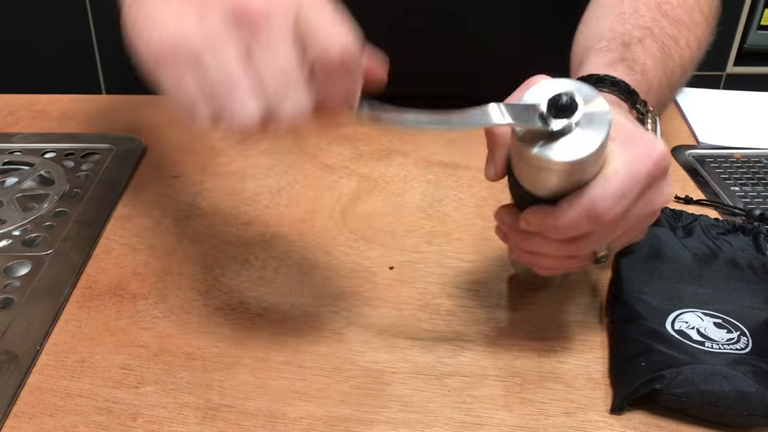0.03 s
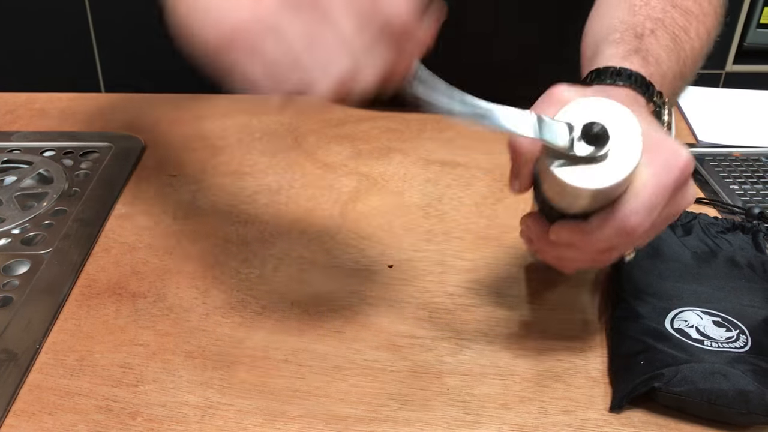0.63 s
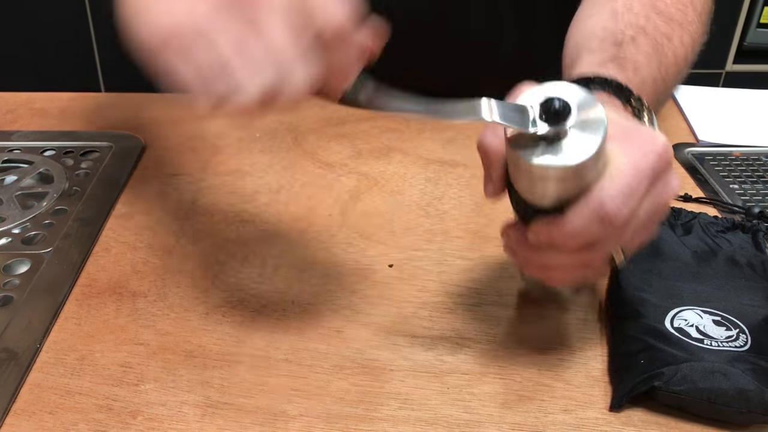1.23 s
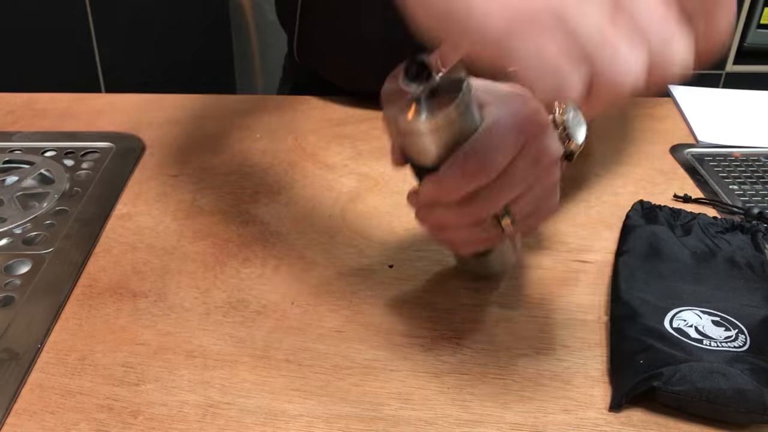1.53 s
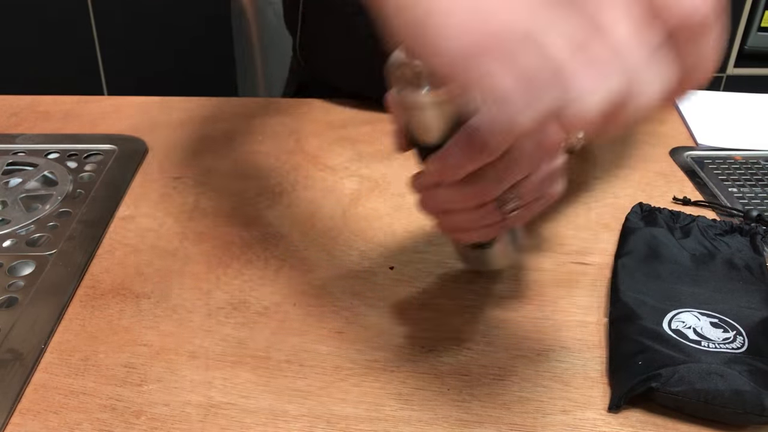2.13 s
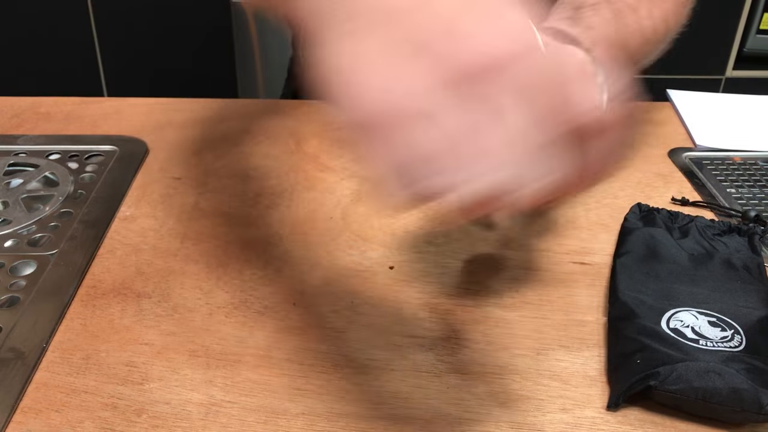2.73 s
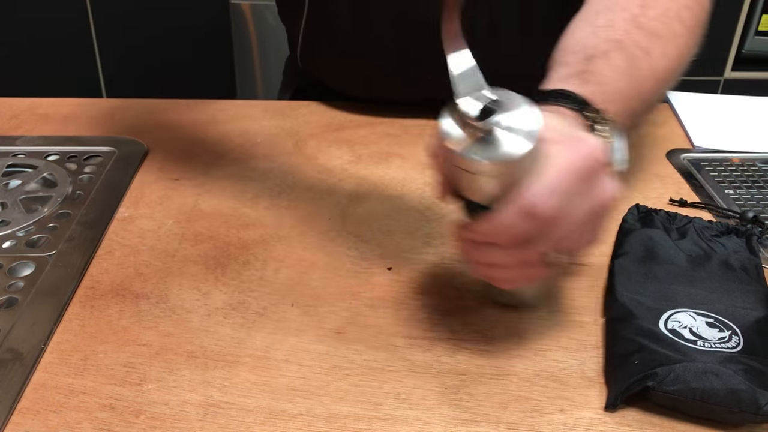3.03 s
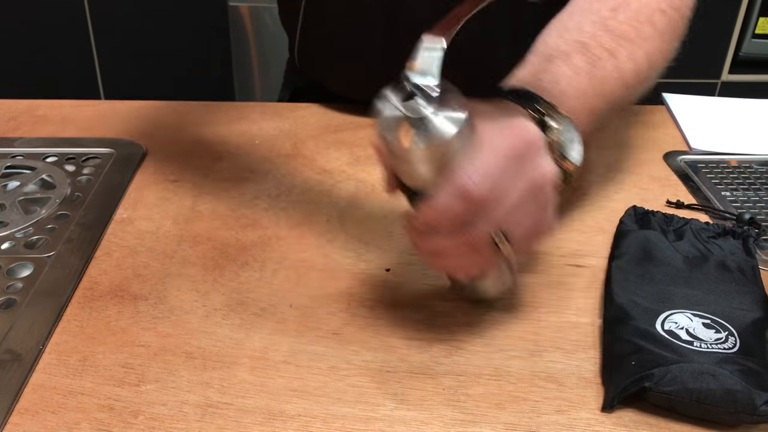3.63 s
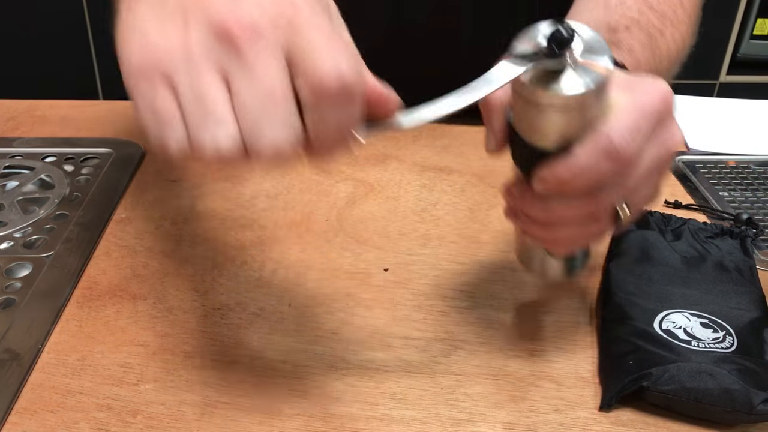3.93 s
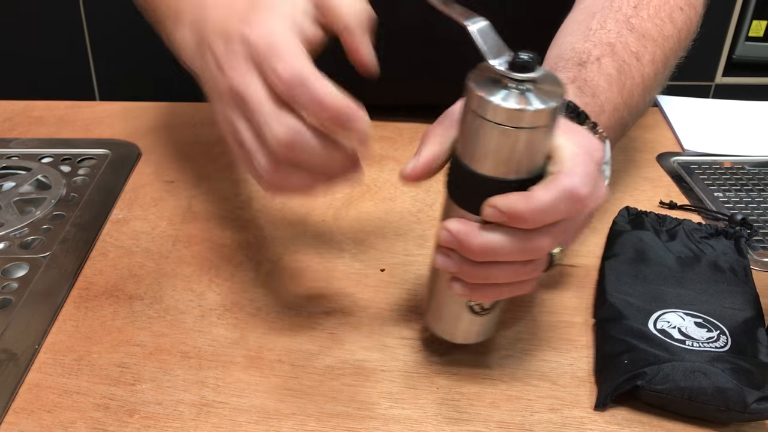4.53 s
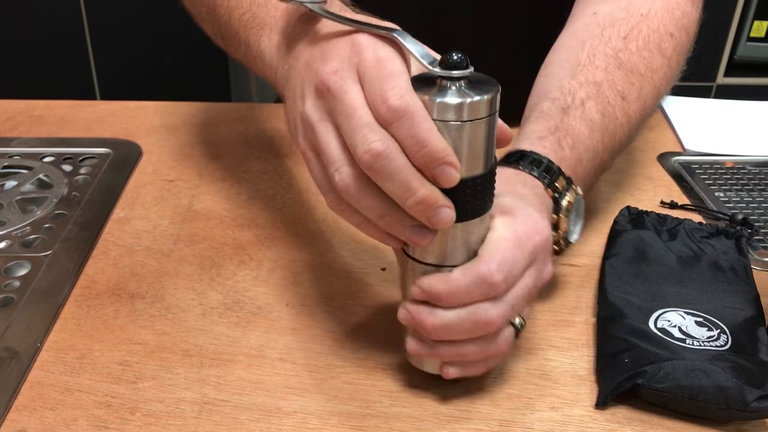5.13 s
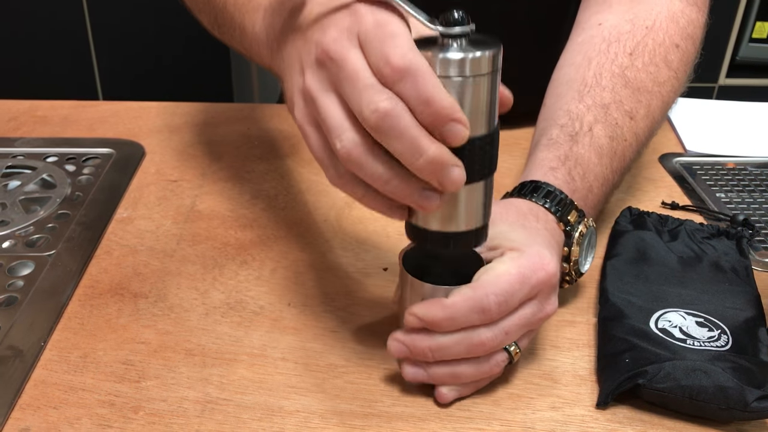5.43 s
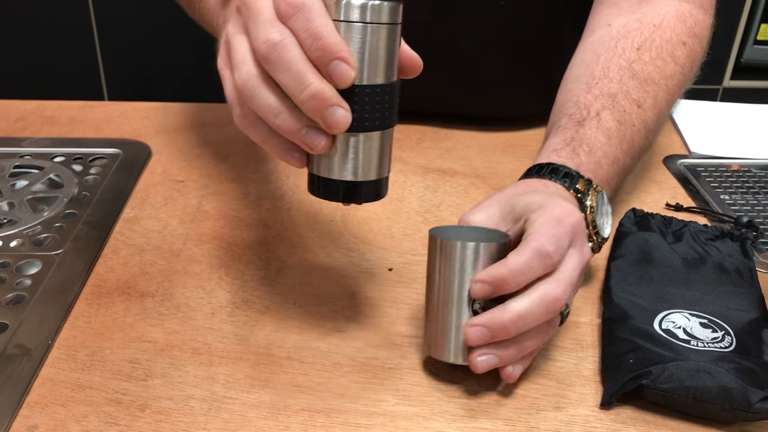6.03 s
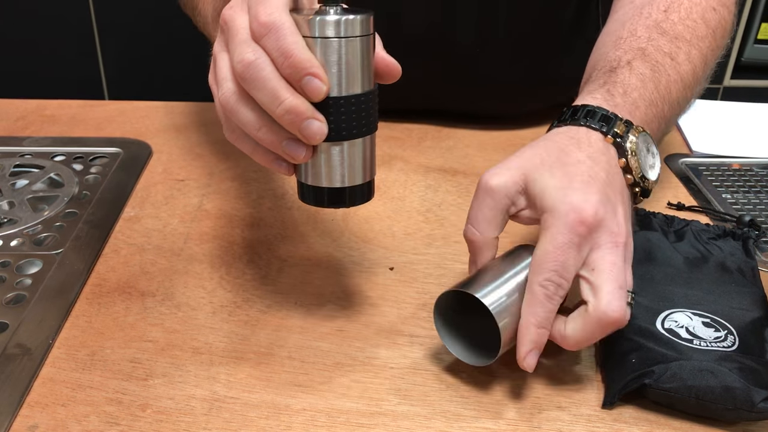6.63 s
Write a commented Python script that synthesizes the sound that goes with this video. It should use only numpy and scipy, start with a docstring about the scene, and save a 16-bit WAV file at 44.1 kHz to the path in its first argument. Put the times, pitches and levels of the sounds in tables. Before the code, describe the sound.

From the start, a steel hand grinder is cranked at a little under two turns a second. Coffee beans crunch and snap irregularly, while the mechanism scrapes and gives a tiny high squeak on most turns. The base bumps the wooden counter with a dull thump at about 2.1 seconds and a much louder, sharper knock at 3.7 seconds. The grinding stops near 4.3 seconds, and the crank settles with a quick cluster of metallic clicks. Faint ticks and the soft slide of hands on steel follow. At about 5.4 seconds the tight catch cup comes off with a loud, hollow pop. It is set down with a soft knock near 6 seconds, and two faint ticks follow around 6.4 seconds. Everything is an arm's length from the microphone, in an echoing kitchen with a low, steady ventilation hum.

```python
"""A steel hand grinder on a wooden kitchen counter, an arm's length from the microphone.
For four seconds it is cranked: beans crumble and snap between the burrs, the shaft rubs and squeaks
about once a turn, and the base thumps down twice. The crank is let go with a few clicks. Then the tight
catch cup comes off with a loud pop and is set down. The kitchen echoes throughout, over a low hum."""
import sys
import numpy as np
from scipy import signal
from scipy.fft import rfft, irfft
from scipy.io import wavfile
from scipy.ndimage import uniform_filter1d

SR = 44100
rng = np.random.default_rng(int(sys.argv[2]) if len(sys.argv) > 2 else 0)


def transcribe(u):
    """Save the signal u as a 16-bit wav file named by the first command-line argument.

    u: samples, shape (n,) or (channels, n), limited to [-1, 1]; the rate is SR.
    q: integer samples, one column per channel.
    """
    v = np.clip(np.atleast_2d(u).T, -1, 1)
    q = np.round(v * 32767).astype(np.int16)
    wavfile.write(sys.argv[1], SR, q)


N = 303408
T = np.arange(N) / SR
TOP_HZ = 17900
TUBE_HZ, TUBE_WIDTH_HZ = 3126, 440  # the ring of the grinder's wall
# beans that snap: (time [s], onset level [dB], treble [dB], t60 [s], favoured pitch [Hz], its gain [dB])
SNAPS = [(0.1496, -23, 1, 0.039, 3000, 10), (0.222, -30, 6, 0.036, 3300, 12),
         (0.2455, -26.5, 6, 0.021, 2300, 7), (0.314, -28, 1, 0.01, 3000, 6),
         (0.328, -30, -8, 0.011, 700, -8), (0.3653, -27.5, -10, 0.015, 700, -3),
         (0.378, -26.0, 4, 0.034, 1300, 6), (0.5153, -30, -1, 0.023, 3000, 3),
         (0.554, -29, 20, 0.045, 1100, -10), (0.578, -29, 9, 0.042, 2300, 0),
         (0.635, -32, 4, 0.013, 2000, -6), (0.7138, -36.5, 12, 0.0072, 2650, 6),
         (0.778, -36.5, 22, 0.0093, 700, 0), (0.85, -31.0, 10, 0.012, 1300, 11),
         (0.947, -27.5, 3, 0.017, 2300, 10), (1.1245, -31, 10, 0.034, 2300, -6),
         (1.166, -33.5, 11, 0.031, 1100, 10), (1.2087, -27, 5, 0.018, 1100, 4),
         (1.2291, -20.5, 6.5, 0.054, 1300, 7), (1.389, -29, -6, 0.025, 3000, -12),
         (1.422, -31, -2, 0.019, 3300, -9), (1.443, -28.5, 3, 0.02, 3000, -2),
         (1.567, -26.5, -5, 0.02, 1300, 11), (1.5906, -27.0, -7, 0.008, 3800, 9),
         (1.6786, -23.5, 4, 0.018, 3000, 6), (1.748, -29, -14.5, 0.012, 4500, -3),
         (1.915, -21.5, 5.5, 0.025, 2000, 2), (1.965, -29, 6, 0.013, 3000, 6),
         (2.163, -32, 3, 0.01, 1300, 11), (2.218, -27.5, 9.5, 0.011, 1500, 17),
         (2.277, -36.5, 22, 0.012, 850, 3), (2.291, -27.5, 9.5, 0.025, 1300, 12),
         (2.4623, -29.0, 10, 0.017, 700, 13), (2.512, -30, 7.5, 0.01, 2650, 4),
         (2.5717, -28.5, 17, 0.018, 2000, 9), (2.6846, -29, 0, 0.014, 3000, -2),
         (2.7542, -36.5, 22, 0.01, 1100, -3), (2.773, -29, -6, 0.012, 1750, 2),
         (2.8226, -27.5, 0, 0.02, 1100, 4), (2.912, -31.5, -2, 0.017, 4500, -3),
         (3.055, -23, 1, 0.014, 3000, -5), (3.073, -35, 14, 0.013, 700, -6),
         (3.157, -28.0, -1, 0.016, 3300, 3), (3.256, -28.0, -3, 0.01, 2650, -11),
         (3.3747, -29, -2, 0.027, 3800, 5), (3.526, -33, 30, 0.018, 1100, 9),
         (3.552, -31.5, 6, 0.012, 3300, 0), (3.569, -33, 2, 0.012, 1750, -8),
         (3.5907, -25.5, 8, 0.029, 3000, -3), (3.6986, -28.0, -11, 0.019, 3800, -8),
         (3.8745, -30, -2, 0.009, 1500, 18), (3.945, -31.0, 5, 0.011, 1750, -4),
         (4.046, -34.0, 11, 0.01, 1300, 3), (4.061, -36, 7, 0.014, 3800, -3),
         (4.118, -31.5, 20, 0.012, 700, 8), (4.161, -27.5, -1, 0.016, 3300, 8),
         (4.2555, -44, 15, 0.0061, 2000, -5)]
# turns of the crank: (time [s], crumb level [dB], grit level [dB])
TURNS = [(-.2, -31, -35.5), (.34, -35, -49), (.91, -36, -45), (1.53, -35.5, -48.5), (2.1, -34, -43.5),
         (2.68, -35.5, -47), (3.22, -35, -51), (3.76, -38.5, -47), (4.28, -33.5, -54)]


def grinding(stop_s=4.27, stop_fade_s=0.02):
    """The burrs crush and rub until the crank stops, while whole beans snap."""
    cranking = np.clip((stop_s - T) / stop_fade_s, 0, 1)
    return (crushing() + rubbing()) * cranking + snapping()


def crushing(hold_s=0.013, hold_drop_db=2.5, powder_db=-54):
    """Crumbs, grit and powder follow the load on the burrs; the tube rings and mashed beans crunch."""
    # hard beans change the load: (time [s], half length [s], level change [dB])
    drags = [(0.405, 0.035, 2), (0.535, 0.076, 1.5), (0.637, 0.037, 5), (0.983, 0.049, 2.5),
             (1.663, 0.072, 1), (2.205, 0.039, -1), (2.403, .05, -0.5), (2.7, 0.018, 2), (2.91, 0.051, 3.5),
             (3.265, .08, 1.5), (3.58, 0.17, 7), (3.734, 0.037, -2), (4.223, 0.036, -2)]
    # the burrs run empty for a moment: (time [s], half length [s], drop [dB])
    gaps = [(0.123, 0.061, 7.5), (0.458, 0.015, 1.5), (0.662, 0.023, 8), (1.109, 0.0099, 14),
            (1.206, 0.016, 18), (1.491, 0.012, 12), (2.01, 0.012, 15.5), (3.008, 0.03, 1.5),
            (3.468, 0.043, 6.5)]
    # hiss of fine grounds: (frequency [Hz], gain [dB])
    powder_colour = [(3000, -39), (8000, -19), (10500, -12), (12100, 5.5), (13500, -1.5), (15000, 4),
                     (16100, 9.5), (17500, -7.5)]
    # ring of the tube wall: (time [s], level [dB])
    tube_level = [(0, -47), (.22, -40), (.45, -39), (.68, -42), (.95, -38), (1.17, -48), (1.42, -37),
                  (1.8, -43.5), (1.96, -36), (2.2, -37.5), (2.4, -48.5), (2.55, -35), (3, -45),
                  (3.11, -36.5), (3.46, -46.5), (3.6, -36.5), (4.06, -49), (4.22, -40)]
    # hollow crunches of mashed beans: (time [s], half length [s], level [dB])
    mashes = [(0.38, 0.016, -43), (0.523, 0.037, -38.5), (0.782, 0.024, -39.5), (1.064, 0.011, -37),
              (2.454, 0.021, -36.5), (2.885, 0.021, -35.5), (3.067, 0.01, -34.5), (4.125, .028, -39)]
    load_db = sum(db * swell(s, half) for s, half, db in drags)
    load_db -= sum(db * swell(s, half) for s, half, db in gaps)
    # a bean resists just before it snaps, and the crumbling slackens
    load_db -= hold_drop_db * sum(swell(s - hold_s / 2, hold_s) for s, *_ in SNAPS)
    crumb_db, grit_db = curves(TURNS)
    crumb_db += 0.97 * once_a_turn(at_turn=0.15) + load_db  # the arm pushes hardest early in the turn
    grit_db += 5.5 * once_a_turn(at_turn=0.6) + 0.52 * load_db  # grit hisses most on the far side
    crumbs = treble(body(crumble(rate=1500, spread_db=2.5, t60=0.025)), -19)
    grit = treble(body(crumble(rate=1900, spread_db=4.5, t60=0.011)), 15.7, corner_hz=8900)
    powder = colour(crumble(rate=2000, spread_db=5.5, t60=.01), powder_colour)
    fragments = unit(crumbs) * undb(crumb_db) + unit(grit) * undb(grit_db)
    hiss = unit(powder) * undb(powder_db + .3 * load_db)
    ringing = friction(TUBE_HZ, TUBE_WIDTH_HZ, drift_hz=30) * undb(curves(tube_level)[0])
    mashing = friction(hz=733, width_hz=253, drift_hz=50) * swells(mashes)
    return shifting(fragments, spread_db=2, rate=70) + ringing + mashing + hiss


def snapping():
    """Each whole bean fractures, rings the tube and favours a pitch of its own."""
    out = np.zeros(N)
    for s, db, treble_db, t60, hz, ring_db in SNAPS:
        fracture = body(burst(t60, tail_db=-21, tail_t60=.04, edge=4))
        fracture += resonate(fracture, TUBE_HZ, TUBE_WIDTH_HZ)
        fracture += undb(ring_db) * resonate(fracture, hz, width_hz=300)
        fracture = treble(fracture, treble_db)
        onset_rms = fracture[:int(.008 * SR)].std()
        add(out, s, fracture * undb(db) / onset_rms)
    return out


def body(x):
    """Whatever breaks between the burrs sounds through the steel tube."""
    # broad colour of the filled grinder in the hand: (frequency [Hz], gain [dB])
    outline = [(100, -28.5), (300, -11), (480, -8), (650, -1.5), (1000, -7), (1600, 2.5), (2500, 0.5),
               (3300, -3.5), (3700, -6), (4500, -7), (5200, -10.5), (8000, -14), (13500, -26), (16500, -26)]
    # its resonances: (frequency [Hz], width [Hz], gain [dB])
    resonances = [(777, 237, 1.5), (1254, 180, -1.5), (6020, 71, -6.5), (8760, 470, -24), (11980, 330, -17)]
    x = colour(x, outline)
    return x + sum(undb(db) * resonate(x, hz, width) for hz, width, db in resonances)


def rubbing(low_ratio=0.497, low_db=-1.5):
    """The burr sings against its ring once a turn, on two resonances; wedged beans scrape the steel."""
    # burr on ring: (time [s], half length [s], pitch [Hz], level [dB])
    rubs = [(.26, 0.076, 7300, -42.5), (.38, 0.057, 7280, -42.5), (.44, .022, 6740, -46),
            (.885, 0.08, 7270, -45), (1.56, 0.16, 7120, -47.5), (2.115, 0.18, 7160, -48.5),
            (2.7, 0.078, 7130, -46), (3.22, 0.11, 7140, -49.5), (3.77, 0.11, 7000, -53)]
    # wedged beans: (time [s], half length [s], pitch [Hz], level [dB])
    scrapes = [(.26, .03, 4330, -52), (.645, 0.032, 4860, -41.5), (.83, .04, 4300, -53),
               (1.34, 0.1, 4800, -47.5), (1.745, 0.064, 4400, -40), (1.84, 0.025, 4200, -45),
               (2.03, .03, 4230, -43), (2.58, 0.1, 4600, -44.5), (2.93, .055, 4400, -40),
               (3.08, 0.027, 4600, -43), (3.24, .06, 4070, -47), (3.6, 0.08, 4600, -45),
               (3.71, 0.036, 4050, -47), (3.87, 0.2, 4200, -46), (4.2, 0.076, 4400, -47.5)]
    rub_hz, rub_gain = strokes(rubs)
    scrape_hz, scrape_gain = strokes(scrapes)
    singing = friction(rub_hz, width_hz=530)
    singing += undb(low_db) * friction(low_ratio * rub_hz, width_hz=670)
    return rub_gain * singing + scrape_gain * friction(scrape_hz, width_hz=670)


def squeaks(waver=0.033, crest=0.77, edge_db=-17):
    """The shaft catches: a whistle that sinks in pitch, swells to a sharp crest and lets go."""
    # catches of the shaft: (time [s], length [s], start pitch [Hz], end pitch [Hz], level [dB])
    catches = [(0.376, 0.007, 8500, 7800, -35), (0.99, 0.024, 9260, 8140, -31.5),
               (0.997, .008, 15400, 14900, -34), (1.597, 0.0057, 7560, 7060, -28.5),
               (1.607, .013, 10100, 9100, -37.5), (2.22, 0.021, 10800, 10500, -43),
               (2.27, .016, 9300, 8900, -38), (2.746, 0.016, 11850, 10550, -24.5),
               (3.348, 0.011, 10550, 10480, -23), (3.937, 0.032, 9700, 9400, -42.5)]
    out, unsteady, grip = np.zeros(N), walk(1400), undb(2 * walk(700))
    for s, length, start_hz, end_hz, db in catches:
        u = np.linspace(0, 1, int(length * SR))
        span = slice(int(s * SR), int(s * SR) + len(u))
        hz = np.interp(u, [0, 1], [start_hz, end_hz]) * (1 + waver * unsteady[span])
        envelope = undb(np.interp(u, [0, crest, 1], [edge_db, 0, edge_db])) * np.sqrt(u * (1 - u)) * 2
        add(out, s, undb(db) * grip[span] * envelope * np.sin(phase(hz)))
    return out


def thumps():
    """The grinder or its cup pushes on the counter; a longer contact gives a duller knock."""
    # blows on the counter: (time [s], peak [dB], contact time [s])
    blows = [(2.0747, -16.5, 0.0038), (3.658, -2.5, 0.0011), (3.668, -25, 0.0059), (5.955, -35, 0.0022),
             (5.967, -31, 0.0022)]
    # counter modes: (frequency [Hz], level [dB], t60 [s])
    counter = [(76, -31, 0.16), (109, -30, 0.15), (153.5, -21, 0.19), (221, 1, 0.092), (305, 2, 0.033),
               (403, 6, 0.026), (618, 7, 0.021), (730, -20, 0.023)]
    out = np.zeros(N)
    for s, db, contact_s in blows:
        force = np.hanning(int(contact_s * SR) + 3)
        add(out, s, peak(np.convolve(ring(counter), force), db))
    return out


def pop(rise_s=0.00098):
    """Air rushes into the freed cup and rings it; the rim knocks just after."""
    # the cup lets go, then chatters: (time [s], ring peak [dB], crack peak [dB], ring tilt [dB/octave])
    pops = [(5.4278, 1, -5, 1), (5.4431, -13.5, -6, 7.5), (5.448, -20.5, -19, -2.5)]
    # cup modes: (frequency [Hz], level [dB], t60 [s])
    cup_modes = [(212, -21.5, 0.1), (359, -10.5, 0.032), (530, 0, .019), (613, 1.5, 0.023),
                 (991, -5.5, 0.032), (1230, -4.5, 0.028), (1566, -2.5, 0.016), (1980, -6, 0.0089),
                 (2780, -9, 0.0121), (3540, -24, .014), (4232, -16.5, .012), (5950, -14, 0.011),
                 (5950, -58, .72), (6640, -21.5, 0.011), (10300, -45, .07)]
    # colour of the crack: (frequency [Hz], gain [dB])
    crack_colour = [(40, -19.5), (75, 2), (130, -1), (400, -1.5), (1150, 8.5), (1550, 2.5), (2500, -3),
                    (4500, -14.5), (6500, -27.5), (9000, -22), (17000, -36)]
    out = np.zeros(N)
    for s, ring_db, crack_db, tilt in pops:
        cup = ring([(hz, db + tilt * np.log2(min(hz, 2000) / 1000), t60) for hz, db, t60 in cup_modes])
        attack = 1 - np.exp(-T[:len(cup)] / rise_s)
        crack = colour(burst(t60=0.023, tail_db=-8.5, tail_t60=0.091), crack_colour)
        add(out, s, peak(cup * attack, ring_db))
        add(out, s, peak(crack, crack_db))
    return out


def handling(steel_db=-6):
    """Hands slide on the steel and the cup over the counter; small clicks ring the steel."""
    # the slides, and a brief soft hiss just before the pop: (time [s], half length [s], level [dB])
    hisses = [(4.698, 0.31, -65), (5.231, 0.0085, -45), (5.282, 0.051, -52.5), (5.424, 0.023, -50.5),
              (5.7, 0.16, -58), (5.947, 0.015, -48.5)]
    # their colour: (frequency [Hz], gain [dB])
    hiss_colour = [(500, -3.5), (1600, 3), (3000, -0.5), (5000, -4), (7300, -4.5), (10500, -11),
                   (12200, -10), (14000, -11.5), (17000, -18.5)]
    # crank play and fingers on the steel: (time [s], peak [dB], treble [dB])
    clicks = [(4.291, -34, 2), (4.337, -37, 12), (4.377, -26, 20), (4.414, -30, 4), (4.4176, -27.5, -8),
              (4.434, -21.5, -2), (4.446, -22.5, 12), (4.467, -37.5, -11), (4.4786, -26, -15),
              (4.607, -44.5, 16), (4.643, -44, 0), (4.7682, -37, -11), (4.8425, -44, -9), (4.868, -50, 6.5),
              (4.885, -45.5, -5), (4.892, -41.5, -0.5), (4.911, -41.5, -20), (4.925, -38.5, 1.5),
              (4.966, -42, -14), (4.9906, -38.5, 7), (5.016, -41, 10), (5.026, -43, -4),
              (5.1118, -48, -0.5), (5.125, -45.5, 7.5), (5.201, -39.5, -13.5), (5.229, -40, -3.5),
              (5.236, -40.5, -3), (5.7, -46, 4), (6.3585, -49, 8), (6.4938, -48, 1.5)]
    # colour of a contact: (frequency [Hz], gain [dB])
    click_colour = [(200, -55), (800, -9), (1400, 7.5), (2500, -5), (5000, -5.5), (8500, -8.5),
                    (10000, -12.5), (12000, -12.5), (17000, -32)]
    # thin steel of the crank and lid: (frequency [Hz], level [dB], t60 [s])
    steel_modes = [(1400, -10, 0.024), (1680, -1.5, 0.038), (4450, -10, .025), (3240, -14, 0.0294),
                   (5900, -14, .02), (7000, -17, .02), (8700, -4, .018), (12100, -5.5, .03),
                   (14140, -19, .012)]
    hiss = colour(crumble(rate=3500, spread_db=1.5, t60=.005), hiss_colour)
    out = unit(hiss) * swells(hisses)
    for s, db, treble_db in clicks:
        contact = colour(burst(t60=.011, tail_db=-21, tail_t60=.04), click_colour)
        # every touch lands elsewhere and favours other modes
        steel = ring([(hz, level + 3 * rng.standard_normal(), t60) for hz, level, t60 in steel_modes])
        tick = peak(contact, 0) + peak(steel[:len(contact)], steel_db)
        add(out, s, peak(treble(tick, treble_db), db))
    return out


def kitchen(x, early_db=-15, early_t60=0.11, bands=14, wander_hz=70):
    """Near surfaces answer at once, the walls with a diffuse tail that is shorter in the high treble."""
    # echo of the walls: (frequency [Hz], level [dB], t60 [s])
    walls = [(70, -4.5, .42), (160, -11, 1), (320, -14, .68), (699, -19, .8), (1175, -12.5, 0.97),
             (1520, -15, 1), (1910, -13.5, 1), (3000, -16.5, 1), (6000, -14.5, 0.9), (11960, -11.5, 0.23)]
    hz, db, t60 = np.transpose(walls)
    t, f = T[:SR], np.fft.rfftfreq(SR, 1 / SR)
    early = undb(early_db) * unit(rng.standard_normal(SR) * fade(early_t60, size=SR) * (t > .004))
    noise, late = rfft(rng.standard_normal(SR)), 0
    edges = np.geomspace(50, TOP_HZ, bands + 1)
    build_up = np.minimum(t / 0.0059, 1)
    for lo, hi in zip(edges, edges[1:]):
        log_centre = np.log(lo * hi) / 2
        envelope = unit(fade(np.interp(log_centre, np.log(hz), t60), size=SR) * build_up)
        band = irfft(noise * (f >= lo) * (f < hi))
        late = late + undb(np.interp(log_centre, np.log(hz), db)) * envelope * band
    near, tail = (signal.fftconvolve(x, echo / np.sqrt(SR))[:N] for echo in (early, late))
    # the tail's phase wanders, so short rings die away as a wash without pitch
    wander = np.exp(1j * phase(wander_hz * walk(250)))
    return x + near + np.real(signal.hilbert(tail) * wander)


def room_tone(air_db=-52.5, motor_db=-49.5, motor_fall_db_per_s=2.5):
    """Ventilation rumble and hum, with a distant motor that fades."""
    # ventilation: (frequency [Hz], gain [dB])
    air_colour = [(25, -22.5), (45, 2.5), (65, -9.5), (100, -3.5), (150, -7), (260, -7), (320, -11),
                  (420, -10), (480, -23), (590, -16.5), (700, -26), (900, -22), (1500, -27.5),
                  (3300, -30.5), (8000, -43), (17000, -48)]
    # the motor's drone: (frequency [Hz], relative level [dB])
    motor_lines = [(112.5, -3), (150, -3), (187.5, -6)]
    # the kitchen's hum: (frequency [Hz], level [dB])
    hum_lines = [(101, -65.5), (145.3, -62), (178, -70.5), (222, -68.5), (264, -64), (500, -70.5),
                 (543, -68.5), (877, -74), (3101, -81.5)]
    air = unit(colour(rng.standard_normal(N), air_colour, size=8192)) * undb(air_db + .5 * walk(2.8))
    motor = tones(motor_lines, waver_db=1) * undb(motor_db - motor_fall_db_per_s * T)
    return air + motor + tones(hum_lines, waver_db=2)


def crumble(rate, spread_db, t60, classes=4):
    """Fragments break at random, rate a second; each size class sheds its own shower of splinters."""
    power = 0
    for k in range(classes):
        sizes = undb(spread_db * np.minimum(rng.exponential(size=N), 3.6))
        breaks = sizes * (rng.random(N) < rate / classes / SR)
        shower = fade(t60 * (k + 1) / classes)
        power = power + signal.fftconvolve(breaks ** 2, shower ** 2)[:N]
    return np.sqrt(np.maximum(power, 0)) * rng.standard_normal(N)


def friction(hz, width_hz, drift_hz=90, grip_db=3.0):
    """Dense slips ring one resonance, whose centre moves with the contact; the grip comes and goes."""
    slips = crumble(rate=2600, spread_db=2.5, t60=.007)
    centre = np.exp(1j * phase(hz + drift_hz * walk(25)))
    ringing = signal.sosfilt(signal.butter(2, width_hz / 2, fs=SR, output="sos"), slips / centre)
    grip = undb(grip_db * walk(170))
    return unit(np.real(ringing * centre) * grip)


def shifting(x, spread_db, rate, bands=32):
    """Each fragment breaks at another place, so the colour keeps changing."""
    spectrum, f = rfft(x), np.fft.rfftfreq(N, 1 / SR)
    band_index = np.interp(f, np.geomspace(600, 16000, bands), np.arange(bands))
    windows = (np.maximum(1 - np.abs(band_index - k), 0) for k in range(bands))
    return sum(irfft(spectrum * window, N) * undb(spread_db * walk(rate)) for window in windows)


def burst(t60, tail_db, tail_t60, edge=3):
    """A sharp fracture, a short shower of splinters and a weaker rattling tail."""
    envelope = fade(t60) + undb(tail_db) * fade(tail_t60)
    crack = envelope * rng.standard_normal(len(envelope))
    crack[0] += edge
    return crack


def ring(modes, size=N // 8):
    """Struck modes (frequency [Hz], level [dB], t60 [s]) start at full speed: no net push of air."""
    return sum(undb(db) * fade(t60, size) * np.cos(2 * np.pi * hz * T[:size]) for hz, db, t60 in modes)


def tones(lines, waver_db, waver_hz=1):
    """Hum lines (frequency [Hz], rms level [dB]) that waver in level and pitch."""
    return sum(np.sqrt(2) * undb(db + waver_db * walk(3.6)) * np.sin(phase(hz + waver_hz * walk(14)))
               for hz, db in lines)


def once_a_turn(at_turn):
    """Swings between -1 and 1, highest at the given part of each turn of the crank."""
    turns_done = np.interp(T, [row[0] for row in TURNS], np.arange(len(TURNS)))
    return np.cos(2 * np.pi * (turns_done - at_turn))


def strokes(table):
    """Pitch and strength of a run of rubbing strokes; the pitch glides from each to the next."""
    times, halves, hz, db = np.transpose(table)
    return np.interp(T, times, hz), swells(zip(times, halves, db))


def swell(s, half_length):
    """A smooth rise and fall round time s, height 1."""
    out = np.zeros(N)
    near = slice(*np.searchsorted(T, [s - 3 * half_length, s + 3 * half_length]))
    out[near] = np.exp(-((T[near] - s) / half_length) ** 2)
    return out


def swells(table):
    """The gain of a run of swells (time [s], half length [s], level [dB])."""
    return sum(undb(db) * swell(s, half) for s, half, db in table)


def walk(rate):
    """Smooth random wandering with a spread near 1."""
    k = max(int(SR / rate), 2)
    steps = np.repeat(rng.standard_normal(N // k + 1), k)
    return unit(uniform_filter1d(steps, k)[:N])


def colour(x, points, size=2048):
    """Minimum-phase filter with the outline (frequency [Hz], gain [dB])."""
    hz, db = np.transpose(sorted(points))
    f = np.maximum(np.fft.rfftfreq(size, 1 / SR), 1)
    gain = undb(np.interp(np.log(f), np.log(hz), db))
    cepstrum = irfft(np.log(gain))
    cepstrum[1:size // 2] *= 2
    cepstrum[size // 2 + 1:] = 0
    return signal.fftconvolve(x, irfft(np.exp(rfft(cepstrum))))[:len(x)]


def resonate(x, hz, width_hz):
    """One resonance, gain 1 at its centre."""
    return signal.lfilter(*signal.iirpeak(hz, hz / width_hz, fs=SR), x)


def treble(x, db, corner_hz=5400):
    """Raise or lower the top of a sound."""
    top = signal.sosfilt(signal.butter(1, corner_hz, "high", fs=SR, output="sos"), x)
    return x + (undb(db) - 1) * top


def fade(t60, size=8192):
    """A decay that falls 60 dB in t60 seconds."""
    return np.exp(-np.log(1000) * T[:size] / t60)


def phase(hz):
    """Running phase of a moving pitch, in radians."""
    return 2 * np.pi * np.cumsum(hz) / SR


def curves(table):
    """The columns of a timed table, sample by sample."""
    s, *columns = np.transpose(table)
    return [np.interp(T, s, c) for c in columns]


def add(out, s, x):
    """Mix x into out at time s."""
    i = max(int(s * SR), 0)
    out[i:i + len(x)] += x[:len(out) - i]


def undb(db):
    """Decibels to gain."""
    return 10 ** (np.asarray(db) / 20)


def unit(x):
    """Scale to rms 1."""
    return x / np.sqrt(np.mean(x ** 2))


def peak(x, db):
    """Scale to a peak level."""
    return x * undb(db) / np.abs(x).max()


def scene(shaft_room_db=-4):
    """Everything happens on the counter, an arm's length from one microphone."""
    shaft = squeaks()  # its thin whistle beams at the microphone more than at the walls
    close = grinding() + thumps() + handling() + pop() + undb(shaft_room_db) * shaft
    return (kitchen(close) + shaft + room_tone())[None]


def record(dry):
    """The recorder drops the deepest bass, clips at full scale and cuts the top."""
    thin = signal.sosfilt(signal.butter(6, 40, "high", fs=SR, output="sos"), dry)
    clipped = np.clip(thin, -1, 1)
    return signal.sosfilt(signal.ellip(12, .1, 70, TOP_HZ, fs=SR, output="sos"), clipped)


dry = scene()
out = record(dry)
transcribe(out)
```